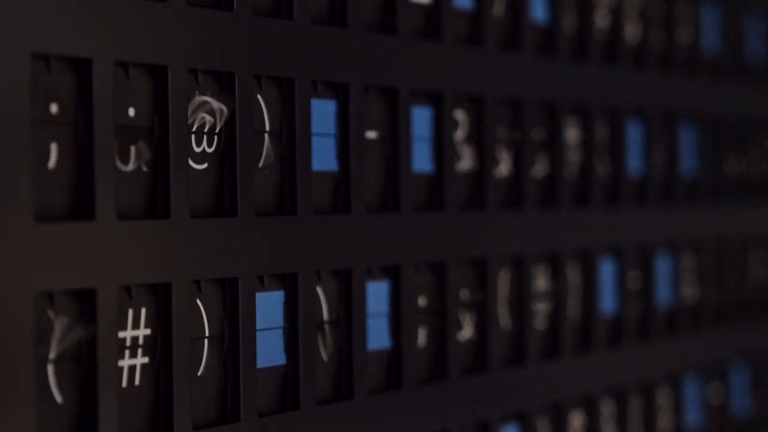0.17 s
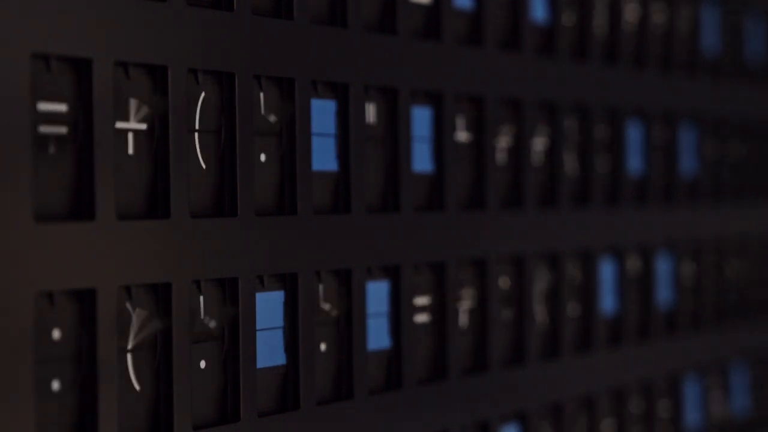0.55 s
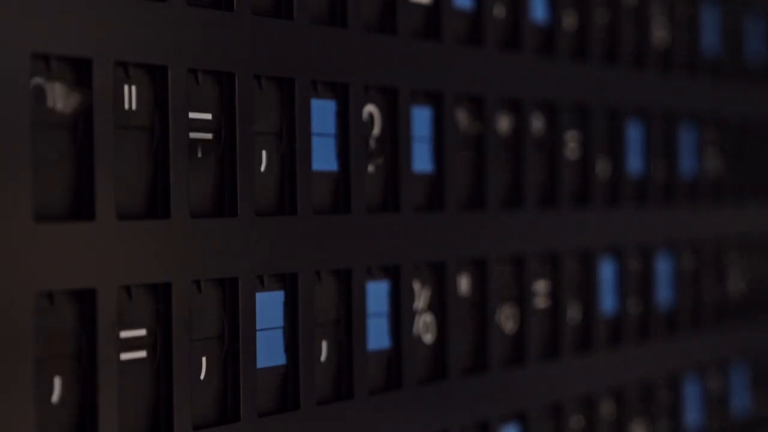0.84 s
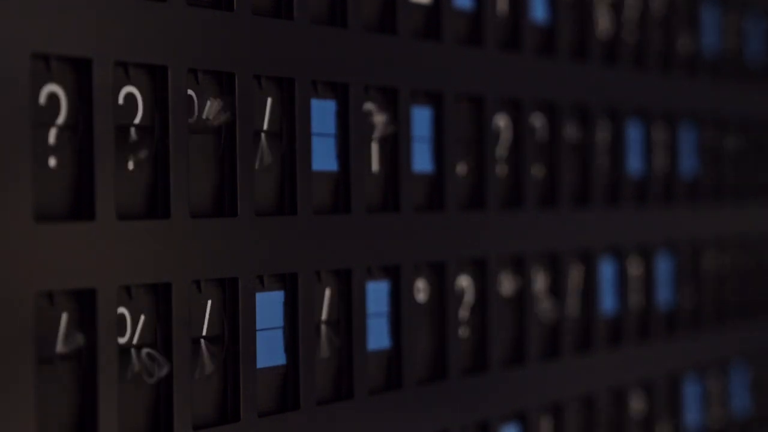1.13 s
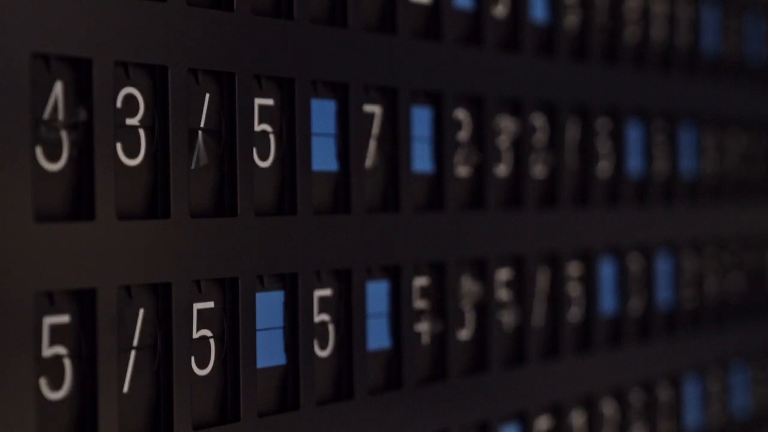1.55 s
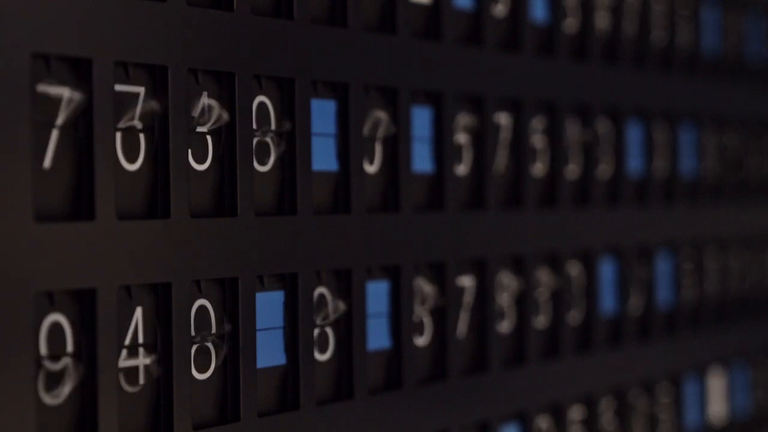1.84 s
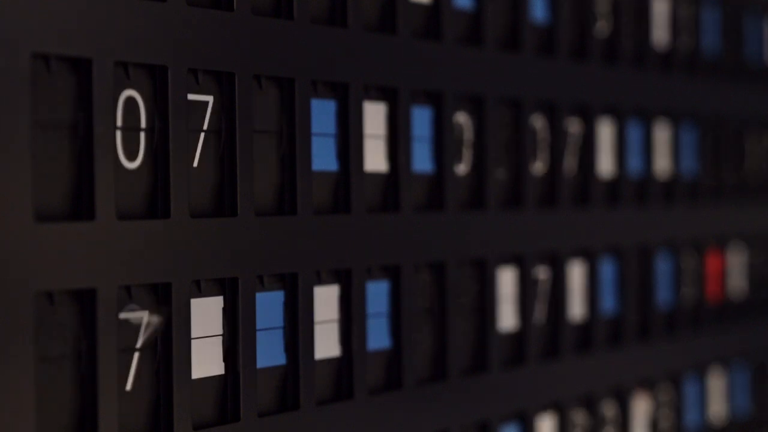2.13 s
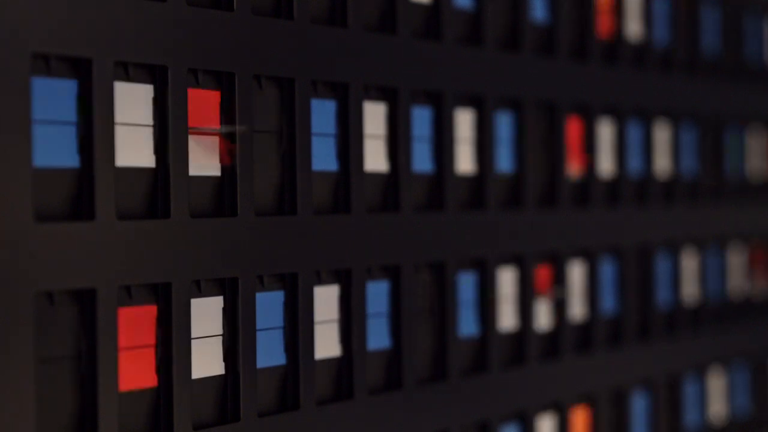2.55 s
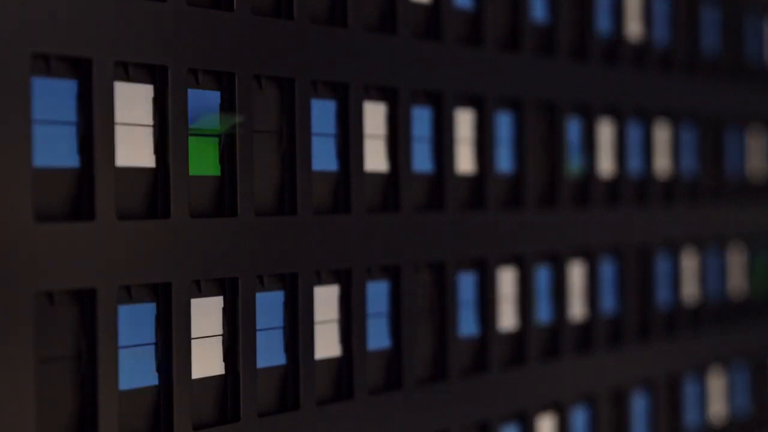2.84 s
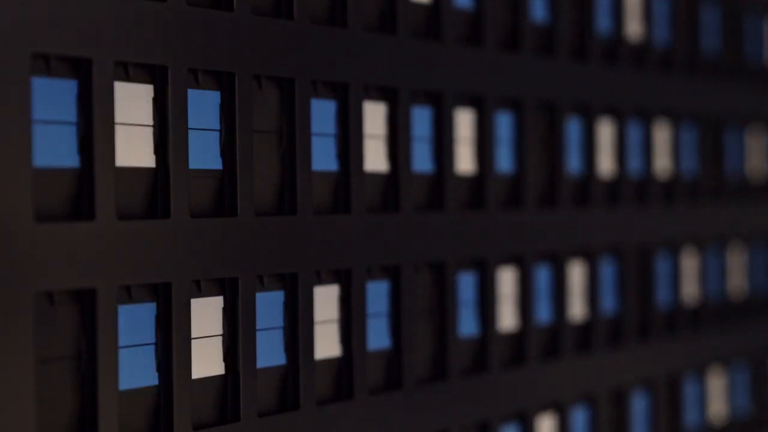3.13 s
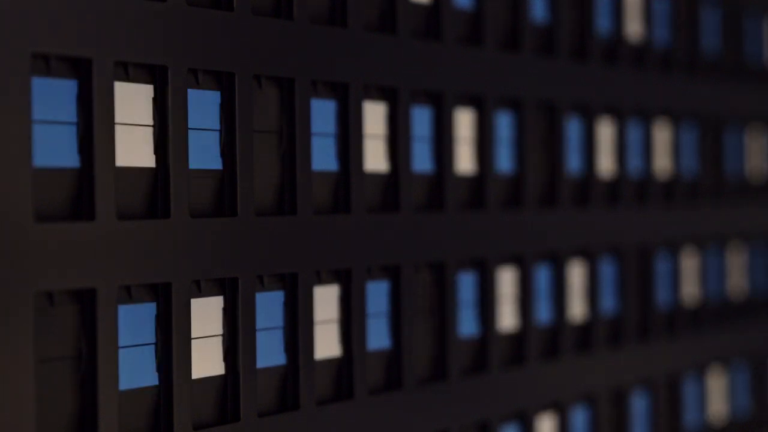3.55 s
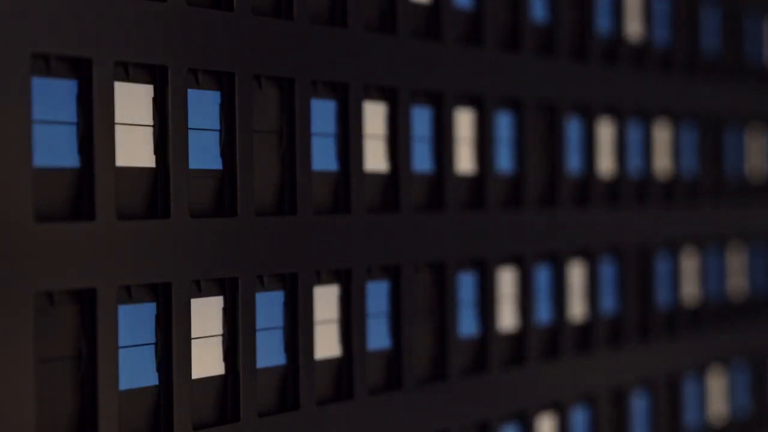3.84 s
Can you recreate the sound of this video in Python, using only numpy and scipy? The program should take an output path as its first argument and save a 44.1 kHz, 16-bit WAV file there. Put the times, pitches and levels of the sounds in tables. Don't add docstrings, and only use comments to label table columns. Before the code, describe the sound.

Many small plastic flaps flip in a fast rhythmic clatter, settling into quiet room rumble.

```python
import sys
import numpy as np
from scipy import signal
from scipy.fft import rfft, irfft, next_fast_len
from scipy.io import wavfile
from scipy.ndimage import uniform_filter1d

SR = 44100
rng = np.random.default_rng(int(sys.argv[2]) if len(sys.argv) > 2 else 0)


def store_wav(level_fs):
    pcm = np.round(np.clip(np.atleast_2d(level_fs), -1, 1) * 32767)
    wavfile.write(sys.argv[1], SR, pcm.T.astype(np.int16))


def level_to_linear(level):
    exponent = np.asarray(level, float) / 20
    return 10 ** exponent


N = 176400
SPAN = next_fast_len(N + SR)

# time_s, steps
DRUM_STEPS = [(-.058, -1), (.423, 5), (.83, 10), (1.23, 15), (1.64, 20), (2.044, 25), (2.278, 28),
              (2.5, 31), (2.72, 34), (2.797, 35), (2.866, 36), (3.0, 38)]
# time_s, level_db, unison_db
ACTIVITY = [(0, 0.5, 1.5), (.3, -1, 3.5), (.6, 0.5, 0.5), (1.0, 0, 2), (1.4, 0, 0.5), (1.75, .5, 2.5),
            (2.05, -1, 2), (2.28, -3, 3), (2.4, -5, 3), (2.6, -7, 4), (2.7, -7, 1.5), (2.801, -7, 5),
            (2.835, -11.5, 3), (2.874, -7.5, -4), (2.9, -50, -1), (2.95, -88, 2)]
FLAPS_PER_S, FLAP_SIZE_DB = 5000, 3.0
THINNING = 0.5
SLAP_LAG_STEPS, SLAP_UNISON = 0.3, 1.8
SLAP_FADE = 1.144

# freq_hz, density_db
TICK_SPECTRUM = [(200, -41), (500, -14.5), (1000, -12), (1600, -9.5), (2600, -9), (7600, -14.5),
                 (12000, -20), (15700, -27)]
TICK_DB, TICK_T60_S = -19.5, 0.008
# freq_hz, level_db, t60_s
HOUSING_MODES = [(192, -14.5, 0.035), (222.4, -15.5, 0.064), (381.4, -14.5, 0.092), (451, -12, 0.059),
                 (514, -6.5, 0.031), (615, -8.5, 0.038), (760, -7.5, 0.037), (858, -6, 0.03),
                 (948, 0, 0.037), (1116, -1.5, .02), (1160, -17.5, 0.0075), (2080, -2.5, 0.019),
                 (2333, 2.5, 0.0093), (3190, -18.5, 0.0071)]
SLAP_DB, DETUNE_RATIO, DETUNE_FULL_HZ = -25, 0.068, 830

PLACES = 20
PORT_GAP_M, SOUND_M_PER_S = 0.07, 343
WALL_SIDE, WALL_SPAN, SHADOW_DB = 0.0, 0.94, 4.5
# freq_hz, t60_s
ROOM_T60 = [(120, 0.99), (500, 0.41), (1000, 0.51), (2300, 0.36), (6000, 0.34), (14000, 0.13)]
ROOM_DB = -4.5
# freq_hz, likeness
ROOM_LIKENESS = [(60, 1), (130, 1), (290, 0.98), (640, 0.67), (1410, .5), (3100, .05), (15000, .05)]
# freq_hz, left_minus_right_db
PORT_LEAN = [(200, 0), (700, 1.2), (2400, .5), (5000, 0), (8100, -1.5), (13000, 1.2)]

# freq_hz, density_db
AIR_SPECTRUM = [(18, -31), (36, -16.5), (82, -7.5), (230, -11.5), (600, -16), (1500, -16.5), (1900, -23.5),
                (16000, -31.5)]
AIR_DB = -52.5
# freq_hz, likeness
AIR_LIKENESS = [(90, 1), (150, .95), (290, .62), (640, .2), (1400, .05), (15000, 0)]
# time_s, lift_db
MOTOR_LIFT = [(0, 15), (2.3, 16), (2.6, 11), (3.15, 14), (4, 10)]
HUM_HZ, HUM_DB = 120, -64

# time_s, peak_db
NEAR_FLAPS = [(2.041, -14), (2.05, -12), (2.189, -15), (2.274, -15), (2.288, -13), (2.406, -18), (2.5, -18),
              (2.585, -19), (2.631, -17), (2.701, -16), (2.724, -18), (2.739, -19), (2.774, -17),
              (2.797, -19), (2.803, -15), (2.82, -20), (2.845, -23), (2.859, -26)]
NEAR_DB, NEAR_T60_S = -3, 0.04
LOW_CUT_HZ, EDGE_HZ = 74.6, 15715


def evened(x):
    return x / np.sqrt(np.mean(x ** 2) + 1e-20)


def read(points, hz):
    f, value = np.transpose(points)
    return np.interp(np.log(hz + 1), np.log(f + 1), value)


def colour(points):
    hz = np.abs(np.fft.fftfreq(4096, 1 / SR))
    log_gain = np.log(level_to_linear(read(points, hz)))
    return np.fft.ifft(np.exp(np.conj(signal.hilbert(log_gain)))).real[:1024]


def pair(a, b, likeness):
    likeness = np.clip(likeness, -1, 1)
    mid = np.sqrt((1 + likeness) / 2) * a
    side = np.sqrt((1 - likeness) / 2) * b
    return np.array([mid + side, mid - side])


def strikes(lag_steps, unison, fade):
    t = np.arange(N) / SR
    when, level_db, unison_db = np.transpose(ACTIVITY)
    step = np.interp(t, *np.transpose(DRUM_STEPS)) - lag_steps
    crowding_db = unison * np.interp(t, when, unison_db) * np.cos(2 * np.pi * step)
    db = fade * np.interp(t, when, level_db) + crowding_db
    share = np.clip(level_to_linear(2 * THINNING * np.minimum(db, 3)), 0.03, 2)
    draw = rng.random(N)
    size = rng.exponential(1, N)
    place = rng.integers(0, PLACES, N)
    hit = np.clip((share * FLAPS_PER_S / SR - draw) * 200, 0, 1)
    hit = hit * rng.choice([-1., 1.], N)
    size_db = FLAP_SIZE_DB * np.minimum(size, 3.5)
    return hit * level_to_linear(db + size_db) / np.sqrt(share), place


def tick():
    t = np.arange(700) / SR
    burst = rng.standard_normal(700) * level_to_linear(-60 * t / TICK_T60_S)
    z = rfft(np.pad(burst, (60, 264)))
    crack = irfft(z / np.sqrt(uniform_filter1d(abs(z) ** 2, size=15)))
    return signal.oaconvolve(crack / np.linalg.norm(crack), colour(TICK_SPECTRUM))


def slap():
    t = np.arange(8000) / SR
    ring = np.zeros(len(t))
    for k, (hz, db, t60_s) in enumerate(HOUSING_MODES):
        spread = DETUNE_RATIO * min(hz / DETUNE_FULL_HZ, 1) ** 2
        mode_hz = hz * (1 + spread * rng.uniform(-1, 1))
        ring += (-1) ** k * level_to_linear(db - 60 * t / t60_s) * np.sin(2 * np.pi * mode_hz * t)
    return ring


def flaps(lag_steps, unison, fade, voice, level_db):
    size, place = strikes(lag_steps, unison, fade)
    z = np.array([rfft(size * (place == k), SPAN) * rfft(voice(), SPAN) for k in range(PLACES)])
    energy = 2 * np.sum(abs(z) ** 2) / SPAN
    return level_to_linear(level_db) * z / np.sqrt(energy / (2.2 * SR))


def room():
    taps = np.zeros((2, SR // 2))
    slots = np.arange(200, SR // 2 - 20, 20)
    at = slots + rng.integers(0, 20, (2, len(slots)))
    np.put_along_axis(taps, at, rng.choice([-1., 1.], at.shape), 1)
    hz, t, z = signal.stft(taps, SR, nperseg=512)
    t60_s = read(ROOM_T60, hz)[:, None]
    z = pair(z[0], z[1], read(ROOM_LIKENESS, hz)[:, None]) * level_to_linear(-60 * t / t60_s)
    tail = signal.istft(z / np.sqrt(t60_s), SR, nperseg=512)[1]
    return tail / np.linalg.norm(tail[0])


def wall():
    z = flaps(0, 1, 1, tick, TICK_DB)
    z = z + flaps(SLAP_LAG_STEPS, SLAP_UNISON, SLAP_FADE, slap, SLAP_DB)
    hz, out = np.fft.rfftfreq(SPAN, 1 / SR), 0
    for k, side in enumerate(WALL_SIDE + WALL_SPAN * np.linspace(-1, 1, PLACES)):
        delay = np.exp(1j * np.pi * hz * side * PORT_GAP_M / SOUND_M_PER_S)
        lead = delay * level_to_linear(side * SHADOW_DB * np.minimum(hz / 4000, 1))
        direct = np.array([lead, 1 / lead])
        out = out + z[k] * (direct + level_to_linear(ROOM_DB) * rfft(room(), SPAN))
    return irfft(out, SPAN)[:, :N]


def air():
    frames, hz = N // 512 + 5, np.fft.rfftfreq(2048, 1 / SR)
    a, b, c, d, patches = rng.standard_normal((frames, 1025, 5)).T
    patches = uniform_filter1d(patches, size=8, axis=0)
    patches = evened(uniform_filter1d(patches, size=6, axis=1))
    lift_db = np.interp(np.arange(frames) * 512 / SR, *np.transpose(MOTOR_LIFT))
    lift_db = lift_db / (1 + (hz[:, None] / 110) ** 4)
    level_db = read(AIR_SPECTRUM, hz)[:, None] + 0.6 * patches + lift_db
    z = pair(a + 1j * b, c + 1j * d, read(AIR_LIKENESS, hz)[:, None]) * level_to_linear(level_db)
    out = signal.istft(z, nperseg=2048, noverlap=1536)[1][:, :N]
    hum = level_to_linear(HUM_DB) * np.sin(2 * np.pi * HUM_HZ * np.arange(N) / SR)
    return level_to_linear(AIR_DB) * out / np.std(out[:, 3 * SR:]) + hum


def near():
    out = np.zeros((2, N + 9000))
    for start_s, peak_db in NEAR_FLAPS:
        crack, ring = tick(), slap()
        shift = rng.integers(-6, 7)
        crack = np.pad(crack / abs(crack).max(), (0, len(ring) - len(crack)))
        flap = ring / abs(ring).max() + crack
        t = np.arange(len(flap)) / SR
        flap = flap * level_to_linear(peak_db + NEAR_DB - 60 * t / NEAR_T60_S)
        start = round(start_s * SR)
        for channel, at in enumerate([start, start + shift]):
            out[channel, at:at + len(flap)] += flap
    return out[:, :N]


def scene():
    cut = signal.butter(3, LOW_CUT_HZ, "high", fs=SR, output="sos")
    return signal.sosfilt(cut, wall() + near()) + air()


def band_limit(x):
    return signal.sosfilt(signal.butter(12, 17040, fs=SR, output="sos"), x)


def record(dry):
    hz = np.fft.rfftfreq(N, 1 / SR)
    lean = level_to_linear(read(PORT_LEAN, hz) / 2)
    mix = irfft(rfft(dry) * [lean, 1 / lean] * (hz < EDGE_HZ), N)
    return band_limit(mix)


dry = scene()
out = record(dry)
store_wav(out)
```